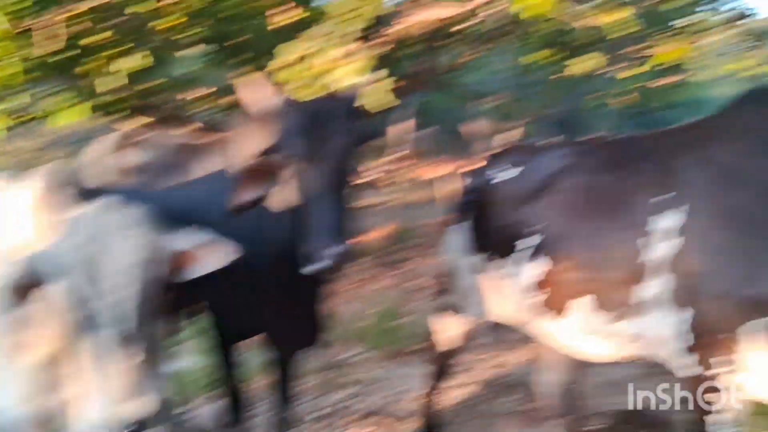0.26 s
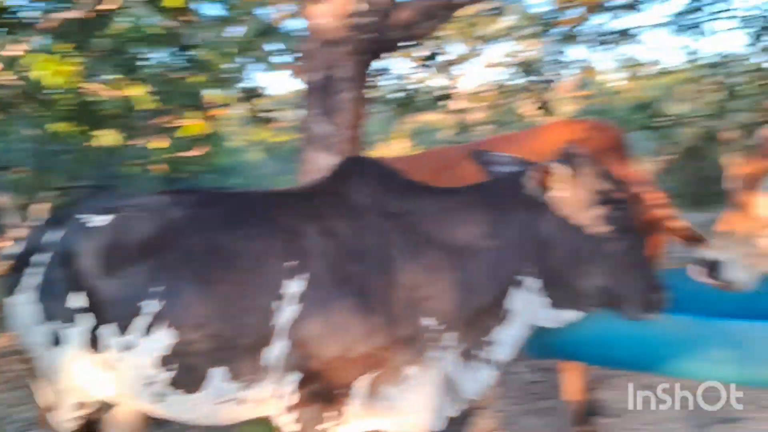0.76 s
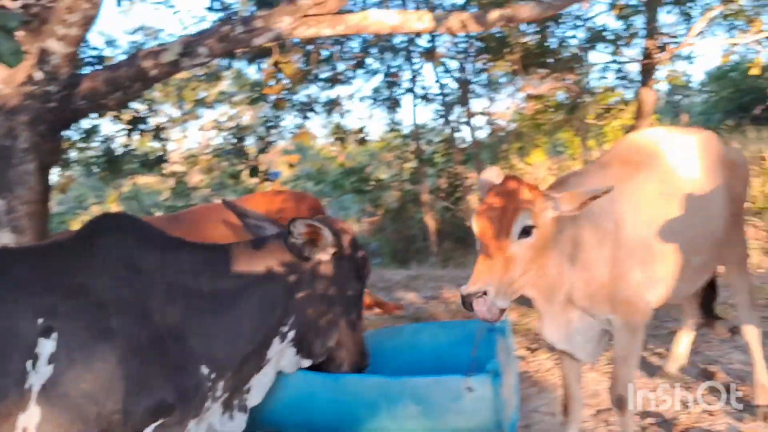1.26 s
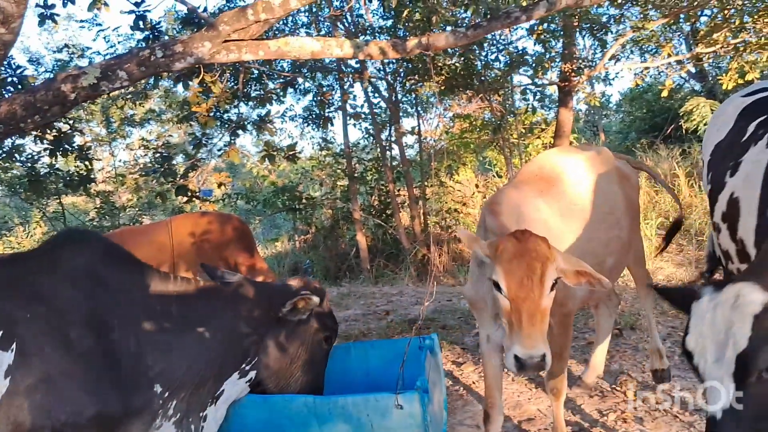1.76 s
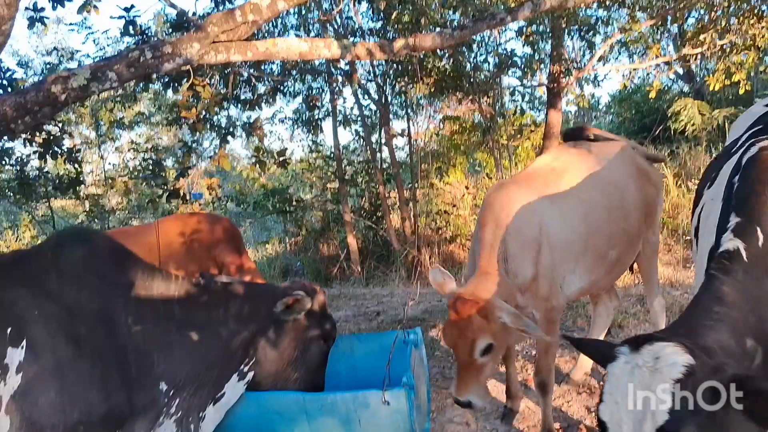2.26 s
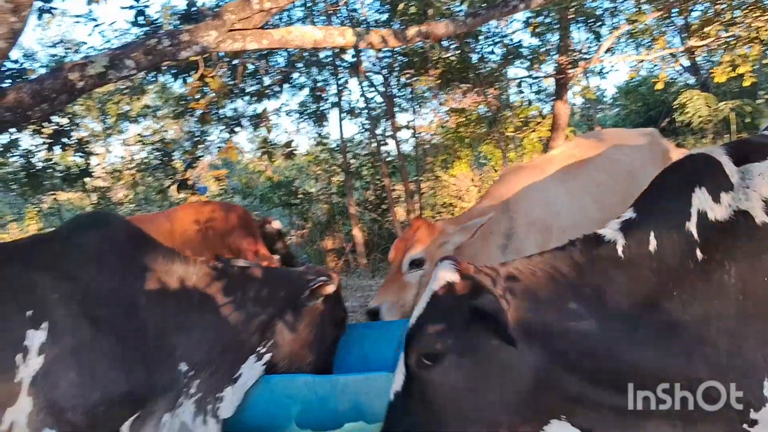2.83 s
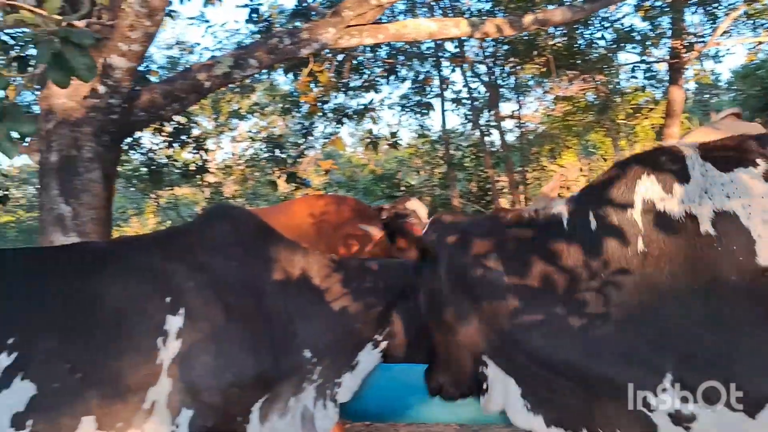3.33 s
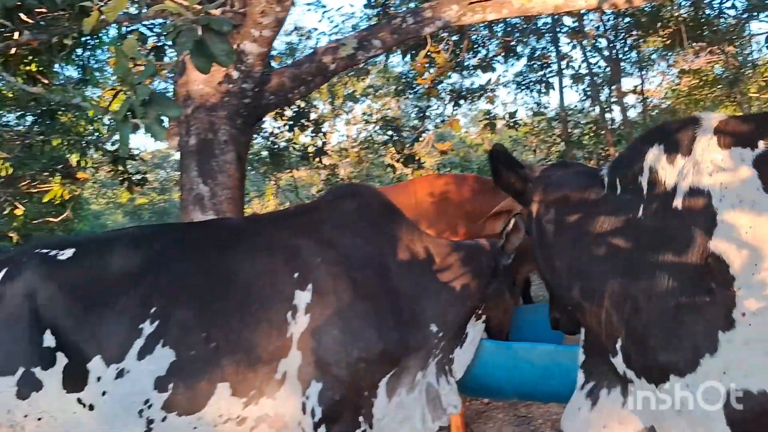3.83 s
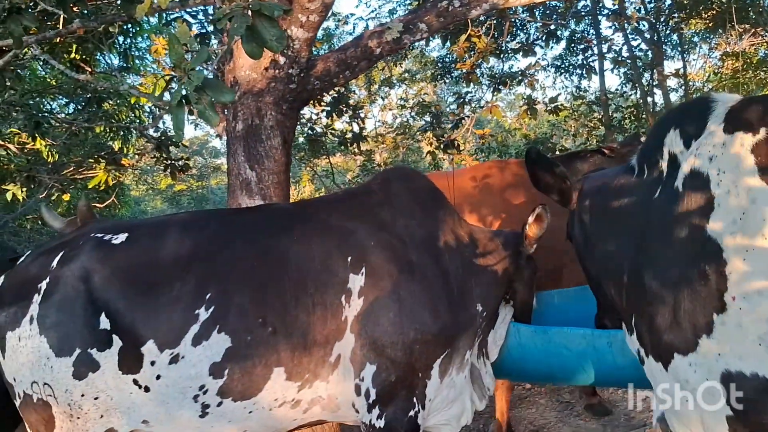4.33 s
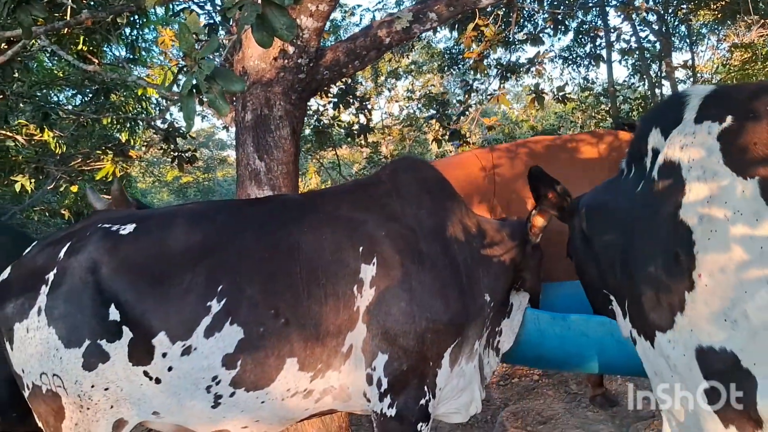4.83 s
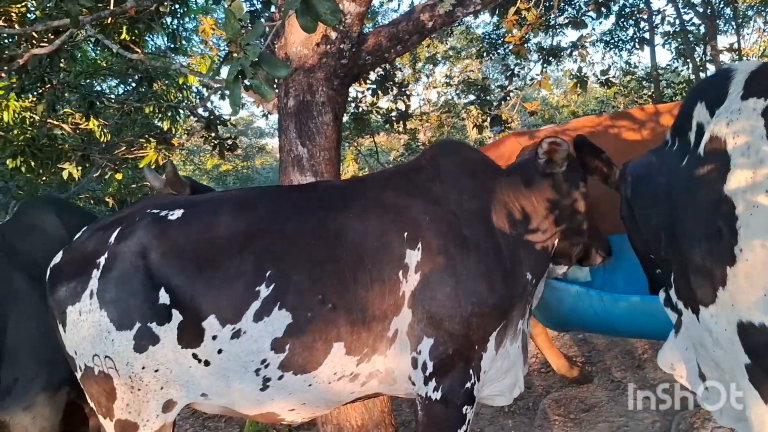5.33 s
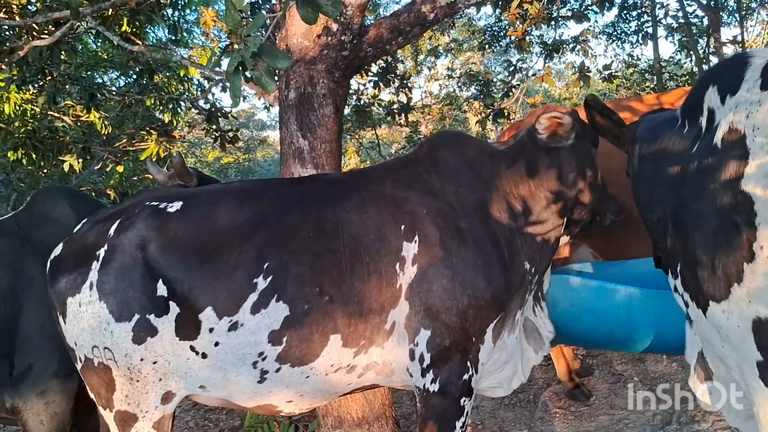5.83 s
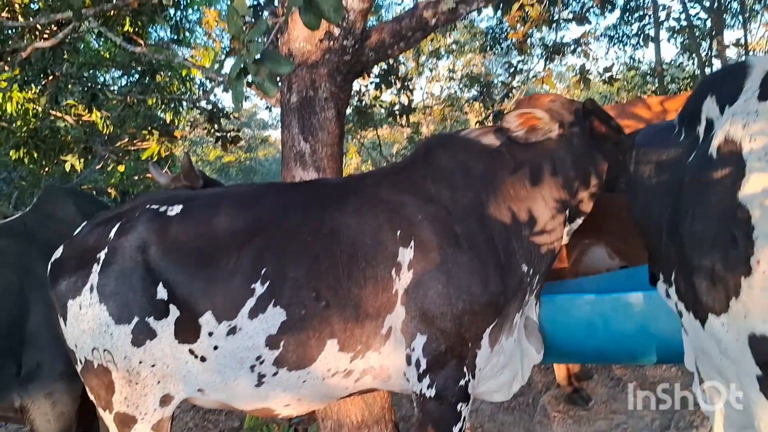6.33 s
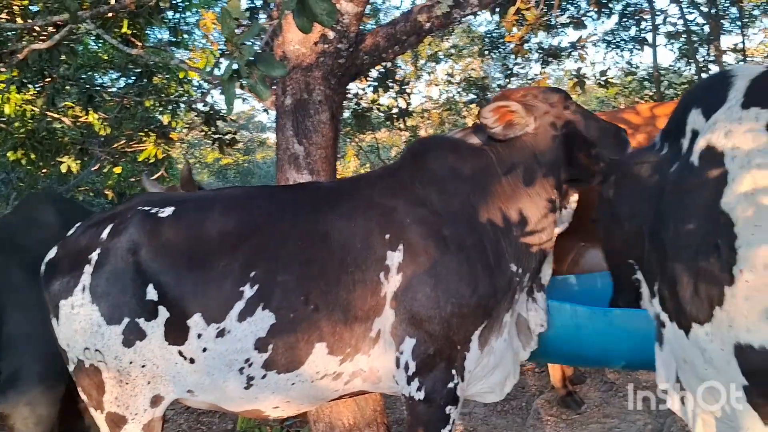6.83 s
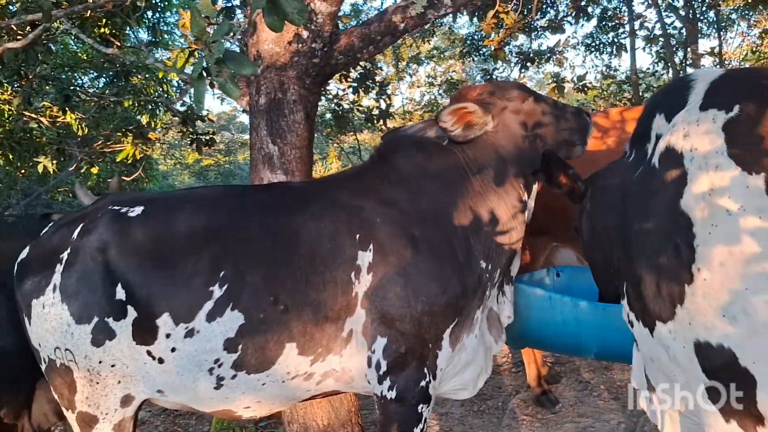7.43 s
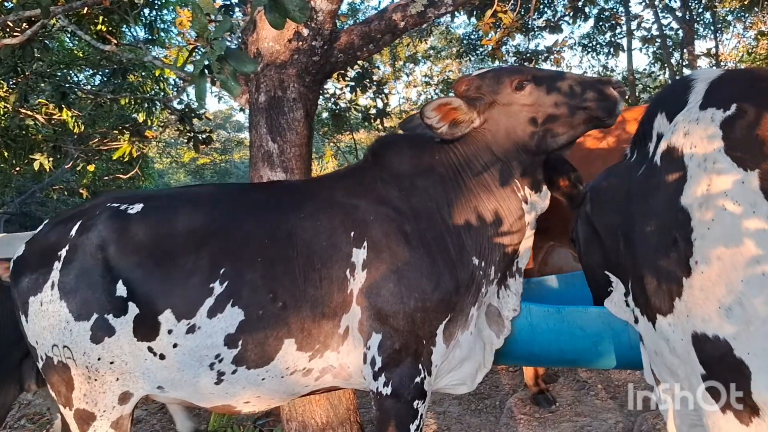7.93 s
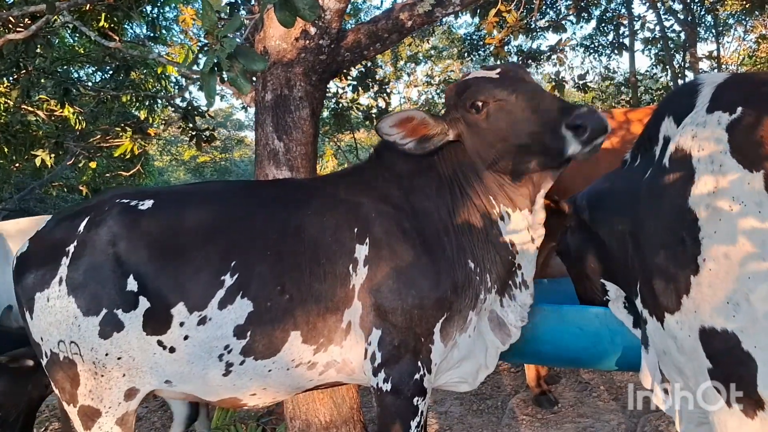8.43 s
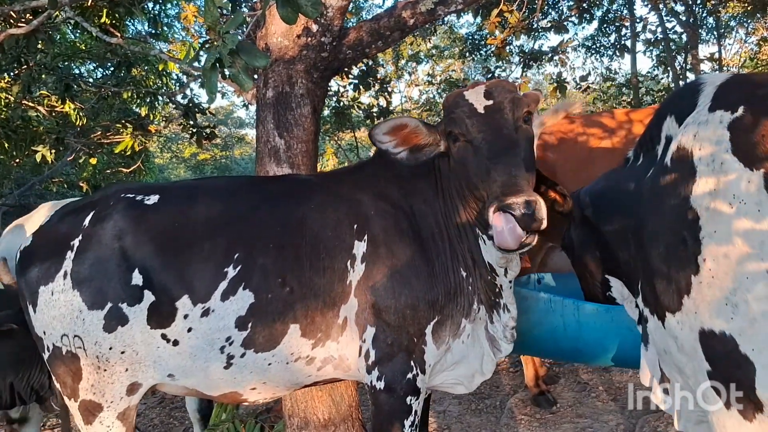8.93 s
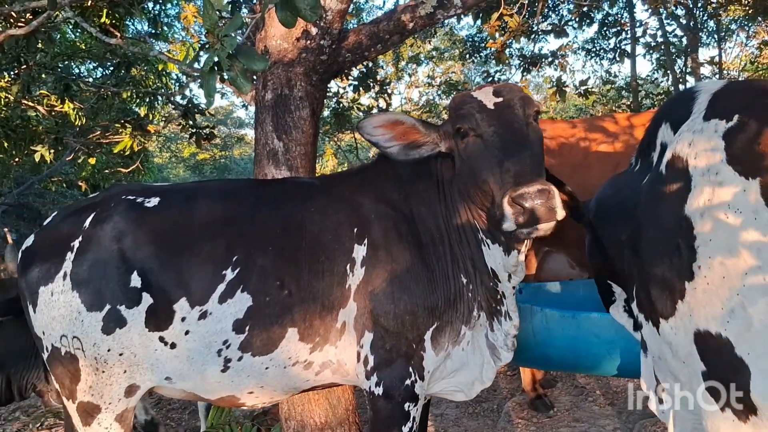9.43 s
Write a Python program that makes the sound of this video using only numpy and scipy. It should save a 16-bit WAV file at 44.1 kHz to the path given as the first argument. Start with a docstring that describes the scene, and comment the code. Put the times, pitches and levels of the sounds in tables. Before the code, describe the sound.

Cattle bump and rub a hollow plastic trough while hooves crunch dry leaves and snap twigs, with faint birds chirping.

```python
"""Hollow bumps and rubbing over crackling leaves: cattle crowd round a plastic trough and lick salt.
Muzzles and tongues drive the modes of the half-barrel shell by impact and by stick-slip friction.
Hooves crush dry leaves and snap twigs, each brittle fracture a click; woody knocks come from the left.
Further off, small birds chirp in the trees over a low hum. Trunks, flanks and ground scatter
short echoes, and the sound reaches two microphone ports with small differences in time and colour."""
import sys
import numpy as np
from scipy import signal
from scipy.fft import rfft, irfft, next_fast_len
from scipy.io import wavfile

SR = 44100
rng = np.random.default_rng(int(sys.argv[2]) if len(sys.argv) > 2 else 0)


def to_wav(s):
    """Save 16-bit WAV."""
    ch = np.atleast_2d(s).T  # columns
    pcm = np.round(np.clip(ch, -1, 1) * 32767)  # PCM
    wavfile.write(sys.argv[1], SR, pcm.astype(np.int16))


N = 426447
LEFT_LEAD_S = .00045   # head start at the left port for the ticks and one patch of leaves


def amp(db):
    """Amplitude ratio of a level in decibels."""
    return 10 ** (np.asarray(db) / 20)


def rms_one(x):
    """Normalisation to unit mean power."""
    return x / np.sqrt(np.mean(x ** 2) + 1e-20)


def peak_one(x):
    """Normalisation to unit peak."""
    return x / np.abs(x).max()


def in_time(curve):
    """Linear interpolation of (time_s, level_db) points at every sample."""
    return np.interp(np.arange(N) / SR, *np.transpose(curve))


def drift(corner_hz):
    """Low-pass filtered noise: a slow random fluctuation of unit rms."""
    step, settle = 40, 2000
    pole = np.exp(-2 * np.pi * corner_hz * step / SR)
    noise = rng.standard_normal(N // step + settle + 2)
    slow = signal.lfilter([1], [1, -2 * pole, pole * pole], noise)[settle:]
    return np.interp(np.arange(N) / step, np.arange(len(slow)), rms_one(slow))


def grains(per_s, spread_db, rows=1):
    """A Poisson process: independent clicks of random sign and very uneven size."""
    sizes = amp(spread_db * np.minimum(rng.exponential(1, (rows, N)), 5))
    signs = rng.choice([-1, 1], (rows, N))
    return sizes * signs * (rng.random((rows, N)) < per_s / SR) + 1e-12


def bursts(per_s, t60_s, steady):
    """Shot noise as a gain of unit rms: random jumps decay exponentially over a steady part."""
    jumps = np.minimum(np.abs(grains(per_s, spread_db=5.0)[0]), 5)
    return rms_one(steady + signal.lfilter([1], [1, -amp(-60 / (t60_s * SR))], jumps))


def strokes(rows, rise_db_per_s, fall_db_per_s, main_bed_db, other_bed_db):
    """Incoherent addition: strokes rise, hold, fall and sum in power over a bed. Two layers, in dB."""
    t = np.arange(0, N, 32) / SR
    main, other = 0, 0
    for start_s, length_s, db, other_db in rows:
        before_s, after_s = np.maximum(start_s - t, 0), np.maximum(t - start_s - length_s, 0)
        power = amp(db - rise_db_per_s * before_s - fall_db_per_s * after_s) ** 2
        main += power
        other += power * amp(other_db) ** 2
    return [10 * np.log10(np.interp(np.arange(N) / SR, t, power) + amp(bed_db) ** 2)
            for power, bed_db in [(main, main_bed_db), (other, other_bed_db)]]


def resonate(x, hz, width_hz):
    """A damped oscillator: one resonance with unit gain at its peak."""
    r = np.exp(-np.pi * width_hz / SR)
    feedback = [1, -2 * r * np.cos(2 * np.pi * hz / SR), r * r]
    return signal.lfilter([(1 - r * r) / 2, 0, (r * r - 1) / 2], feedback, x)


def coloured(x, spectrum):
    """Zero-phase filtering by (frequency_hz, gain_db) points joined on a log-frequency axis."""
    size = next_fast_len(N)
    hz = np.maximum(np.arange(size // 2 + 1) * SR / size, 5)
    points_hz, points_db = np.transpose(spectrum)
    gain = amp(np.interp(np.log(hz), np.log(points_hz), points_db))
    return irfft(rfft(x, size) * gain, size)[..., :N]


def placed(x, lead_s, pan_db=0):
    """Path difference: a source reaches the left port lead_s earlier and pan_db louder."""
    return np.array([amp(pan_db / 2) * x, amp(-pan_db / 2) * np.roll(x, round(lead_s * SR))])


def echoes(x, t60_s, level_db=-5):
    """Diffuse scattering: trunks, flanks and ground return a short dull tail, different at each port."""
    t = np.arange(SR // 5) / SR
    dull_noise = signal.lfilter([1], [1, -.4], rng.standard_normal((2, len(t))))
    tail = dull_noise * amp(-60 * t / t60_s) * (t > .002)
    tail /= np.sqrt(np.sum(tail ** 2, axis=1, keepdims=True))
    tail = signal.sosfilt(signal.butter(4, 430, "high", fs=SR, output="sos"), tail)
    return amp(level_db) * signal.fftconvolve(x, tail, axes=1)[:, :N]


# Spectrum of the far rustle and hum: frequency_hz, relative_db
AIR_SPECTRUM = [(24, -30), (40, -11), (69, 1.5), (697, -15), (896, -16), (1300, -9), (3060, -8.5),
                (16000, -35)]
def air(stir_db):
    """Ambient noise that swells with the herd; the difference between the ports grows in the treble."""
    mid, side = coloured(rng.standard_normal((2, N)), AIR_SPECTRUM)
    side = 1.03 * side + signal.sosfilt(signal.butter(2, 600, "high", fs=SR, output="sos"), side)
    level_db = -62.5 + 0.71 * (stir_db - stir_db.mean()) + 0.69 * drift(corner_hz=0.8)
    return amp(level_db) * rms_one(np.array([mid + side, mid - side]))


def whistle(start_hz, glide, length_s):
    """Frequency and amplitude modulation: a bird's note glides by a fraction of its pitch and warbles."""
    t = np.arange(int(length_s * SR)) / SR
    pitch_hz = start_hz * (1 + glide * t / length_s)
    warble = 1 + 0.48 * np.sin(2 * np.pi * start_hz / 25.8 * t)
    return warble * np.sin(np.pi * t / length_s) * np.sin(2 * np.pi * np.cumsum(pitch_hz) / SR)


# Runs of falling notes: start_s, note_count, pitch_hz
TWITTER_RUNS = [(7.015, 5, 2175)]
# Loudness of the bird chorus: time_s, level_db
CHORUS_LEVEL = [(0, -70), (2, -59.5), (8, -67), (9.67, -68)]
def bird_chorus(count):
    """Superposition: tiny notes in two registers and a twitter merge, blurred by scattering in trees."""
    out = np.zeros((2, N + SR))
    for when, register, pitch, glide, length, loudness, side in rng.random((count, 7)):
        hz = (2850 if register < .6 else 4200) * 1.35 ** (pitch - .5)
        note = amp(6 * loudness) * whistle(hz, .45 * (glide - .55), length_s=.02 + .035 * length)
        out[:, int(when * N):][:, :len(note)] += placed(note, .001 * (side - .5), 6 * (side - .5))
    out = rms_one(out)
    for start_s, note_count, hz in TWITTER_RUNS:
        for k in range(round(note_count)):
            note = amp(2) * whistle(hz * rng.uniform(.93, 1.1), glide=-.33, length_s=.022)
            out[:, round((start_s + .026 * k) * SR):][:, :len(note)] += note
    chorus = out[:, :N]
    return amp(in_time(CHORUS_LEVEL)) * (chorus + echoes(chorus, t60_s=.15))


# Single bird calls: start_s, pitch_hz, glide_fraction, level_db
BIRD_CALLS = [(3.385, 2860, .013, -52), (4.04, 2680, 0.013, -52), (4.6, 3050, -0.06, -52),
              (5.415, 4650, -.02, -50), (5.44, 2950, -0.058, -46), (6.562, 3000, 0.061, -53),
              (6.625, 2850, .14, -63), (6.67, 2550, .1, -57), (6.805, 2920, -.084, -57),
              (6.935, 3000, -0.061, -56), (7.255, 2890, -.06, -54), (7.45, 3090, -0.12, -53),
              (8.405, 2750, 0.18, -73), (8.575, 2980, -.07, -56)]
def chirps():
    """Direct sound: short gliding notes arrive without echoes and so stay clear."""
    out = np.zeros(N + SR)
    for start_s, hz, glide, db in BIRD_CALLS:
        note = whistle(hz, glide, length_s=0.0334)
        out[round(start_s * SR):][:len(note)] += amp(db) * note
    return placed(out[:N], lead_s=0.00026)


# Hollow woody knocks from the far left: start_s, peak_db
WOODY_KNOCKS = [(2.065, -25), (2.071, -21), (2.13, -31), (3.042, -19.5), (3.3582, -26.5), (3.4287, -20.5),
                (3.4378, -19), (3.542, -22.5), (3.8105, -23.5), (4.067, -31), (4.796, -24.5), (4.8297, -18),
                (5.8, -23)]
def knocks(pitch_hz=1500, t60_s=.04):
    """Impulse response: a hard, gritty tap rings one hollow note, a shade higher or lower each time."""
    out, t = np.zeros(N + SR), np.arange(SR // 10) / SR
    for start_s, db in WOODY_KNOCKS:
        grit = rng.standard_normal(len(t))
        tap = grit * amp(-60 * t / t60_s) + 12 * (t == 0)
        note = resonate(tap, pitch_hz * (1 + .04 * grit[-1]), width_hz=340)
        overtone = .3 * resonate(tap, 2 * pitch_hz, width_hz=2500)
        out[round(start_s * SR):][:len(t)] += amp(db) * peak_one(note + overtone)
    return placed(out[:N], lead_s=.00056)


# Spectrum of crushed dry leaves: frequency_hz, relative_db
LEAF_SPECTRUM = [(350, -14), (600, -7), (1260, -2.5), (1850, -1), (2610, -2.5), (3390, -1.5), (4050, -3),
                 (7410, -4.5), (8860, -11), (12200, -5), (16000, -16)]
# Hooves scuffing through the litter: start_s, length_s, level_db, crumbs_relative_db
HOOF_SCUFFS = [(.1, 0.2, -51.5, -4.5), (.71, 0.27, -50, 0), (1.02, 0.063, -50.5, 2),
               (1.12, 0.065, -45.5, 2), (1.29, 0.095, -48.5, -1.5), (1.65, 0.022, -53, -4.5),
               (2.26, 0.16, -45, -4.5), (2.72, 0.076, -54.5, -3), (3.03, 0.0044, -42, -10),
               (3.2, 0.16, -53, -5.5), (3.43, 0.21, -51.5, -6), (4.065, 0.042, -54.5, -5),
               (4.17, 0.083, -51, -9), (4.305, 0.0087, -50.5, -1), (4.7, 0.33, -52.5, -2.5),
               (5.17, 0.03, -52.5, -0.5), (5.305, 0.29, -51, -6), (5.535, 0.0063, -42, 0.5),
               (5.6, 0.19, -47.5, -4.5), (5.9, 0.65, -60, -6), (6.27, 0.089, -46.5, -4.5),
               (7.77, 0.076, -50, -6.5), (8.065, 0.052, -54.5, 3), (8.885, 0.014, -65.5, 14.5),
               (9.0, 0.13, -57, -2), (9.215, 0.01, -57.5, -4)]
def leaves(stir_db):
    """Crackling noise: leaves fracture in clumps at four places; brittle crumbs give the treble."""
    crunch_db, crumbs_db = strokes(HOOF_SCUFFS, rise_db_per_s=1800, fall_db_per_s=227,
                                   main_bed_db=stir_db + 5, other_bed_db=stir_db)
    fractures = grains(per_s=1500 * amp(5 * drift(corner_hz=17)), spread_db=3.5, rows=4)
    crackles = coloured(fractures + 0.22 * rng.standard_normal((4, N)), LEAF_SPECTRUM)
    places = [(0.48, LEFT_LEAD_S), (1.0, .00036), (1.0, .00022), (0.82, -.0003)]
    litter = sum(gain * placed(crackle, lead_s) for crackle, (gain, lead_s) in zip(crackles, places))
    crunch = signal.sosfiltfilt(signal.butter(2, 5500, fs=SR, output="sos"), litter)
    crumbs = litter - crunch
    clumps = bursts(per_s=50, t60_s=0.053, steady=2.4)
    return clumps * (amp(crunch_db) * rms_one(crunch) + amp(crumbs_db) * rms_one(crumbs))


# Single brittle leaves breaking: start_s, level_db
LEAF_TICKS = [(0.1898, -13), (1.252, -22), (1.2887, -20.5), (1.3163, -27), (0.3154, -16), (0.711, -17),
              (0.8714, -12.5), (4.7403, -23), (7.807, -20.5), (3.2924, -29), (3.699, -26), (3.7933, -23),
              (4.6258, -19), (4.7004, -29), (5.305, -34), (5.437, -28), (6.6581, -24.5), (8.7896, -28.5),
              (9.051, -32), (9.1214, -30.5)]
def ticks():
    """A brief pulse has a broad spectrum: a needle-sharp click, with a few bright crumbs after it."""
    out, t = np.zeros(N + SR), np.arange(SR // 20) / SR
    envelope = amp(-60 * t / 0.0011) + 0.087 * amp(-60 * t / 0.03)
    for start_s, db in LEAF_TICKS:
        tick = resonate(rng.standard_normal(len(t)) * envelope, hz=19500, width_hz=13000)
        out[round(start_s * SR):][:len(t)] += amp(db) * peak_one(tick)
    return placed(out[:N], LEFT_LEAD_S)


# Twigs and leaves snapping underfoot: start_s, level_db, pitch_hz, t60_s, left_lead_s
TWIG_SNAPS = [(.1265, -26, 1500, 0.04, .00056), (0.3154, -21, 1660, 0.0092, .00005),
              (0.356, -37, 1300, .015, .00005), (0.459, -34, 1000, .015, .00005),
              (0.6658, -29, 2320, 0.055, .00043), (0.711, -19, 2710, 0.13, .00043),
              (0.7564, -20, 2500, 0.089, .00043), (.8268, -22.5, 1920, 0.045, .00045),
              (0.8722, -19.5, 2500, .025, .00047), (.9107, -31, 4170, .047, .00045),
              (0.9327, -15, 2440, 0.01, .00045), (1.033, -24, 2580, 0.034, .00043),
              (1.059, -24, 2490, .03, .00043), (1.138, -26, 1900, .03, .00043),
              (1.152, -20.5, 1960, 0.064, .00043), (1.3486, -22, 2170, .034, .00047),
              (1.399, -28, 4050, .03, .00045), (1.499, -28, 920, 0.023, .00013),
              (2.171, -25, 2770, 0.15, .00054), (2.285, -17, 2150, 0.089, .00043),
              (2.351, -21, 2420, .03, .00047), (3.028, -17.5, 2800, 0.029, .00066),
              (3.247, -25.5, 2290, 0.048, .00045), (3.275, -32, 1400, .012, .00005),
              (3.6041, -21, 2700, 0.075, .00045), (4.389, -49, 960, 0.033, .00009),
              (4.7404, -24.5, 2860, 0.043, .00045), (5.305, -27, 2010, 0.054, .00002),
              (5.352, -30, 2200, 0.033, .00002), (5.6016, -18, 1960, 0.065, .00009),
              (6.045, -27.5, 2120, .014, .00045), (6.053, -24, 3430, 0.016, .00045),
              (6.503, -38, 1520, 0.04, .00002), (7.807, -22, 1070, 0.012, .00041),
              (7.895, -33, 2120, 0.029, .00034), (8.09, -28, 2360, 0.018, .00045),
              (8.6135, -26, 1300, 0.073, .00023), (8.985, -21, 1300, 0.045, .00025)]
def snaps(spray_db=-14.5):
    """Brittle fracture: a sharp crack excites a short ring and its overtone, with a spray of crumbs."""
    out, t = np.zeros((2, N + SR)), np.arange(SR // 6) / SR
    highpass = signal.butter(2, 6000, "high", fs=SR, output="sos")
    for start_s, db, hz, t60_s, lead_s in TWIG_SNAPS:
        grit, crumbs = rng.standard_normal((2, len(t))) * amp(-60 * t / t60_s)
        crack = grit + 18 * (t == 0)
        ring = resonate(crack, hz, 0.38 * hz) + 0.1 * resonate(crack, 1.9 * hz, 0.16 * hz)
        body = ring + 0.083 * resonate(crack, hz=1700, width_hz=2100)
        spray = signal.sosfilt(highpass, crumbs)
        snap = amp(db) * (peak_one(body) + amp(spray_db) * peak_one(spray))
        out[:, round(start_s * SR):][:, :len(t)] += placed(snap, lead_s)
    return out[:, :N]


# Wet tongue strokes: centre_s, half_length_s, level_db, mouth_hz
TONGUE_STROKES = [(6.325, 0.034, -42.5, 2350), (8.906, 0.035, -43.5, 860)]
def licks():
    """Cavity resonance: gritty noise swells and fades through a mouth's note and its two overtones."""
    out, t = np.zeros(N), np.arange(N) / SR
    grit = rms_one(grains(per_s=4100, spread_db=-3.5)[0])
    for centre_s, half_s, db, hz in TONGUE_STROKES:
        span = slice(round((centre_s - 2 * half_s) * SR), round((centre_s + 2 * half_s) * SR))
        cavity = sum(gain * resonate(grit[span], harmonic * hz, width_hz=250)
                     for harmonic, gain in [(1, 1), (2, .5), (3, .25)])
        swell = np.exp(-(1.13 * (t[span] - centre_s) / half_s) ** 2)
        out[span] += amp(db) * rms_one(cavity) * swell
    return placed(out, lead_s=0.00028)


# Modes of the plastic trough: frequency_hz, bandwidth_hz, level_db
TROUGH_MODES = [(63, 23, -9), (131, 51, -2), (204.7, 25.7, 1), (253.7, 41.6, 0.5), (343, 64.5, 2.5),
                (407.7, 81, 2), (508, 157, -3.5), (638, 66, -4), (767, 350, -12), (995, 127, -5),
                (1505, 270, -10.5)]
def shell(force, strengths_db, detune=1):
    """Normal modes: the trough rings, its pitches shifted by the load on it. One row a mode."""
    return np.array([(-1) ** k * amp(db + strengths_db[k]) * resonate(force, detune * hz, width_hz)
                     for k, (hz, width_hz, db) in enumerate(TROUGH_MODES)])


# Muzzles shoving along the trough: start_s, length_s, level_db, deep_modes_relative_db
MUZZLE_RUBS = [(.2, 0.19, -56, -7), (.55, 0.29, -55, -4.5), (1.0, 0.19, -52.5, -11),
               (1.33, 0.02, -41.5, -12), (1.44, 0.25, -57.5, -17), (2.27, 0.25, -50, 1),
               (3.23, 0.11, -57.5, -21), (3.52, 0.28, -53.5, -9), (3.9, 0.048, -54, -4),
               (4.1, 0.32, -55.5, -9), (4.7, 0.049, -67, 19.5), (4.745, 0.12, -42, -5),
               (4.86, 0.035, -46.5, 3), (5.0, 0.017, -49.5, -7), (5.17, 0.079, -49.5, -3),
               (5.3, 0.052, -43, -15), (5.46, 0.29, -40, -2.5), (5.94, 0.14, -55, -8.5),
               (6.3, 0.15, -53, 1), (6.51, 0.089, -53, 6), (7.28, 0.11, -58, -2), (7.77, 0.067, -56, -10),
               (8.24, 0.062, -61, -8), (8.475, 0.12, -60, -3), (8.88, 0.2, -64, -9.5),
               (9.235, 0.0084, -54.5, 0), (9.45, 0.3, -87.5, 10.5)]
def rubbing(stir_db):
    """Stick-slip friction: a rough, soft tongue drives the shell; a leaning body drives its deep modes."""
    rub_db, weight_db = strokes(MUZZLE_RUBS, rise_db_per_s=616, fall_db_per_s=158,
                                main_bed_db=stir_db - 1.5, other_bed_db=stir_db - 6.5)
    slips = grains(per_s=1200, spread_db=2.0)[0] * bursts(per_s=30, t60_s=0.1, steady=3.5)
    soft_slips = signal.lfilter([1], [1, -np.exp(-2 * np.pi * 700 / SR)], slips)   # 700 Hz low-pass
    modes = shell(soft_slips, strengths_db=np.zeros(len(TROUGH_MODES)))
    deep = np.array([hz < 230 for hz, _, _ in TROUGH_MODES])
    return amp(rub_db) * rms_one(modes[~deep].sum(0)) + amp(weight_db) * rms_one(modes[deep].sum(0))


# Bumps on the trough and hoof falls: start_s, level_db, contact_hz (lower is softer)
IMPACTS = [(0.136, -25.5, 473), (0.41, -39.5, 265), (0.555, -40, 390), (0.666, -34.5, 452),
           (0.712, -38.5, 253), (0.756, -32, 283), (0.823, -29.5, 400), (0.87, -35.5, 475),
           (0.929, -41.5, 480), (1.092, -40, 416), (1.125, -32.5, 437), (1.347, -32, 300),
           (1.446, -39, 294), (1.495, -32, 215), (1.653, -40.5, 254), (2.07, -40.5, 440),
           (2.166, -36.5, 345), (2.281, -37, 444), (3.038, -34, 320), (3.227, -44, 403), (3.599, -36, 315),
           (3.788, -33, 794), (4.197, -35.5, 332), (4.311, -37.5, 520), (4.39, -31.5, 745),
           (4.554, -40.5, 355), (4.696, -41.5, 203), (4.744, -37, 427), (4.834, -27.5, 347),
           (4.858, -20.5, 556), (5.025, -41.5, 250), (5.222, -34.5, 285), (5.305, -29.5, 840),
           (5.346, -25, 480), (5.461, -26.5, 593), (5.588, -36, 208), (5.709, -37, 333),
           (6.502, -24.5, 585), (7.467, -46, 396), (7.804, -44.5, 290), (7.892, -41, 253),
           (8.213, -59, 352), (8.26, -45.5, 476), (8.28, -45.5, 444), (8.311, -47.5, 330),
           (8.349, -33, 231), (8.473, -40, 1500), (8.61, -39, 227), (8.983, -36.5, 980), (9.241, -41, 354)]
def bumps(light_push_s=0.033, heavy_db=-29.5, boom_db=-9):
    """Impact excitation: each dull push strikes its own mix of the modes; a low boom outlasts it."""
    out, t = np.zeros(N + SR), np.arange(SR // 4) / SR
    grits = rng.standard_normal((len(IMPACTS), len(t)))
    mode_mixes_db = rng.normal(0, 3.2, (len(IMPACTS), len(TROUGH_MODES)))
    for (start_s, db, hz), grit, strengths_db in zip(IMPACTS, grits, mode_mixes_db):
        t60_s = light_push_s * (1 + amp(db - heavy_db))   # a push at heavy_db lasts twice as long
        fade_db = -60 * t / t60_s
        contact = grit * (amp(fade_db) + 1.3 * amp(-60 * t / 0.012))
        push = resonate(resonate(contact, hz, 0.33 * hz), hz, 6.4 * hz)
        ring = shell(push, strengths_db, detune=amp(0.37 * grit[-1])).sum(0)
        boom = grit * amp(fade_db / 2.3)
        for _ in range(2):
            boom = resonate(boom, hz=150, width_hz=220)
        bump = peak_one(ring + 0.23 * push) + amp(boom_db) * peak_one(boom)
        out[round(start_s * SR):][:len(t)] += amp(db) * bump
    return out[:N]


# Restless shuffle of the herd, which sets the beds between strokes: time_s, level_db
HERD_STIR = [(0, -64), (1.05, -55), (1.83, -64), (2.75, -61.5), (3.5, -62), (4.5, -65.5), (5.55, -61),
             (6.6, -62.5), (7.12, -71.5), (7.35, -64), (9.1, -67), (9.35, -71), (9.67, -71)]
def scene():
    """Superposition of the herd's direct sound, its shifting echoes, the birds and the air."""
    stir_db = in_time(HERD_STIR)
    trough = placed(rubbing(stir_db) + bumps(), lead_s=0.00012)
    herd = trough + licks() + leaves(stir_db) + snaps() + knocks() + ticks()
    shares = np.array([drift(corner_hz=1.64) for _ in range(4)])   # bodies move, so the echoes change
    shares /= np.linalg.norm(shares, axis=0)
    scatter = sum(echoes(herd * share, t60_s=0.032) for share in shares)
    return herd + scatter + bird_chorus(count=600) + chirps() + air(stir_db)


# Difference in response between the microphone ports: frequency_hz, left_minus_right_db
PORT_DIFFERENCE = [(150, 2), (380, -2.5), (950, 1), (2380, -5), (5980, -0.5), (15000, 3)]
def record(dry, stopband_hz=16400):
    """Frequency response: each port colours the sound its own way, and a steep low-pass cuts the top."""
    left = coloured(dry[0], [(hz, db / 2) for hz, db in PORT_DIFFERENCE])
    right = coloured(dry[1], [(hz, -db / 2) for hz, db in PORT_DIFFERENCE])
    return signal.sosfilt(signal.cheby2(14, 70, stopband_hz, fs=SR, output="sos"), [left, right])


dry = scene()
out = record(dry)
to_wav(out)
```